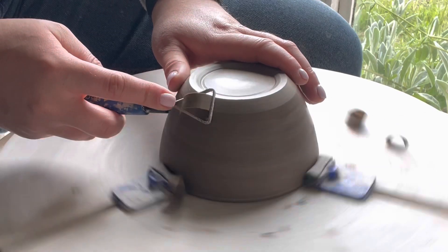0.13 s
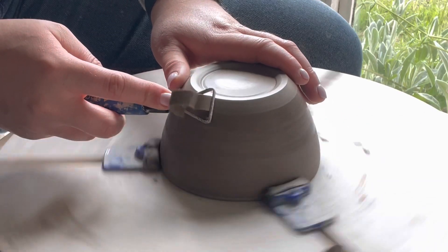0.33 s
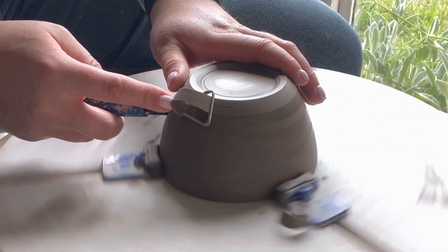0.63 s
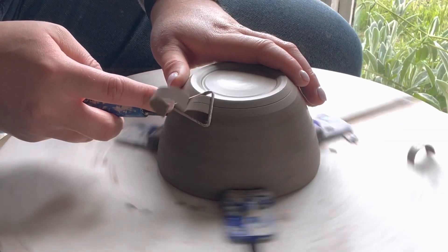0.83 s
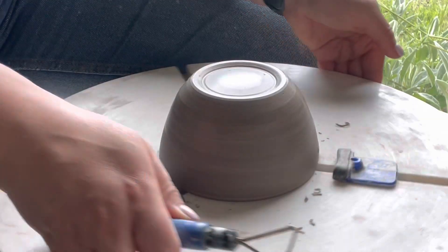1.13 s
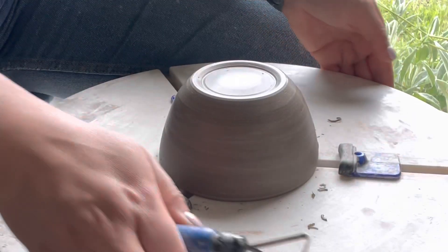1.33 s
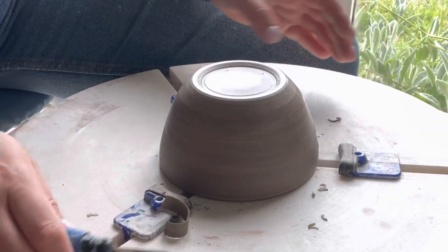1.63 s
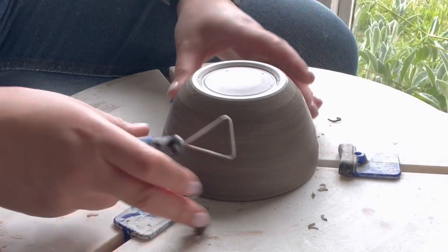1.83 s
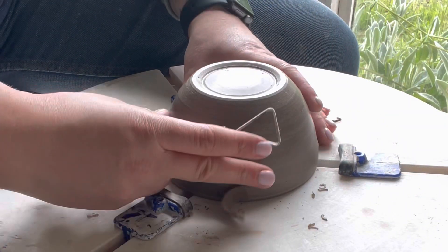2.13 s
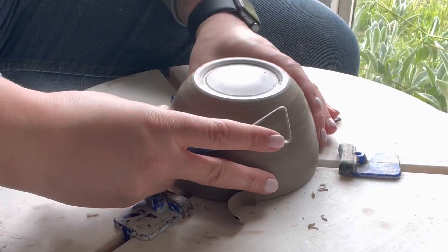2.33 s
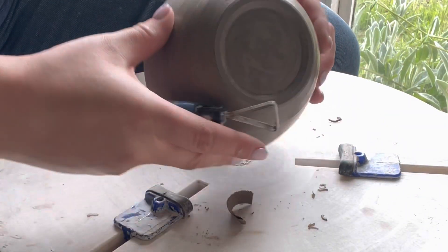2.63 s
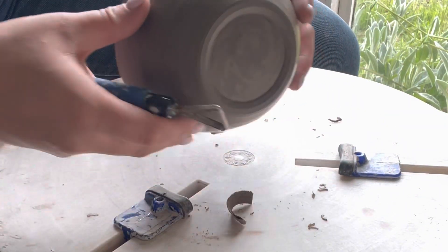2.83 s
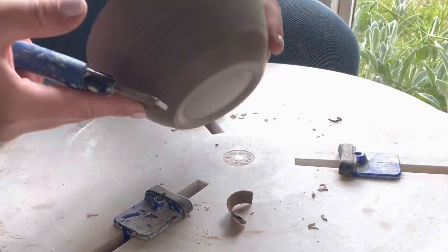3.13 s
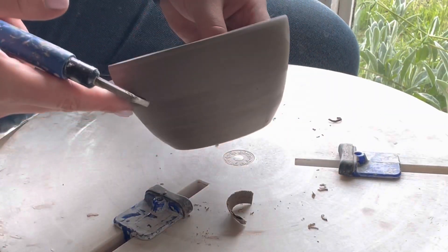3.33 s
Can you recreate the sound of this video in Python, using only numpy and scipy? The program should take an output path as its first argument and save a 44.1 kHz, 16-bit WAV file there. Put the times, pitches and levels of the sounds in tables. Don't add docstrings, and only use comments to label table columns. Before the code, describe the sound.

A blade softly scrapes a clay bowl on a humming wheel with small ticks, then clamps grind loudly open, squeak, and a few dull knocks follow; close stereo microphone, small studio, garden engines droning outside.

```python
import sys
import numpy as np
from scipy import signal
from scipy.fft import rfft, irfft, next_fast_len
from scipy.io import wavfile
from scipy.ndimage import uniform_filter1d, map_coordinates

SR = 44100
rng = np.random.default_rng(int(sys.argv[2]) if len(sys.argv) > 2 else 0)


def makeup_ratio(level_db):
    decades = np.asarray(level_db, float) / 20
    return 10 ** decades


def to_wav(sig):
    pcm = np.clip(np.atleast_2d(sig), -1, 1) * 32767
    pcm = np.round(pcm).astype(np.int16)
    wavfile.write(sys.argv[1], SR, pcm.T)


N = 153468
T = np.arange(N) / SR
CHANGE_S = 0.9347


def unit(x):
    return x / np.sqrt(np.mean(x ** 2) + 1e-20)


def along(points, hz):
    f, db = np.transpose(points)
    return np.interp(np.log(hz + 1), np.log(f + 1), db)


def curves(rows):
    s, *columns = np.transpose(rows)
    return [np.interp(T, s, column) for column in columns]


def wobble(rate):
    knots = rng.standard_normal(int(N * 400 / SR) + 4)
    return map_coordinates(knots, [T * min(rate, 400)])


def filtered(x, response):
    size = next_fast_len(N + 8192)
    return irfft(rfft(x, size) * response(np.fft.rfftfreq(size, 1 / SR)), size)[..., :N]


def rings(peaks):
    def response(f):
        total = 0
        for k, (hz, width, db) in enumerate(peaks):
            total = total + (-1) ** k * makeup_ratio(db) * 1j * f * width / (hz * hz - f * f + 1j * f * width)
        return total
    return response


def bell(hz, octaves):
    return lambda f: np.exp(-(np.log2((f + 1) / hz) / octaves) ** 2 / 2)


def grit(grain_db, patchy_db):
    grains = rng.standard_normal(N) * makeup_ratio(grain_db * np.minimum(rng.exponential(size=N), 5))
    z = signal.stft(grains, nperseg=512)[2]
    patches = uniform_filter1d(rng.standard_normal(z.shape), size=6, axis=0)
    patches = unit(uniform_filter1d(patches, size=8, axis=1))
    return unit(signal.istft(z * makeup_ratio(patchy_db * patches), nperseg=512)[1][:N])


def window(start, length, rise):
    u = (T - start) / length
    return np.sin(np.pi / 2 * np.clip(np.minimum(u / rise, (1 - u) / (1 - rise)), 0, 1)) ** 2


def machine(hz, db, orders, drift, flutter_db):
    phase = 2 * np.pi * np.cumsum(hz * (1 + drift * wobble(6.106))) / SR
    total = 0
    for multiple, order_db in orders:
        level = np.sqrt(2) * makeup_ratio(db + order_db + flutter_db * wobble(7))
        total = total + level * np.sin(multiple * phase + 2 * np.pi * rng.random())
    return total


# (frequency [Hz], level [dB])
FAN = [(63.4, -50), (126.9, -53)]
# (time [s], frequency [Hz], level [dB])
MOWER = [(0, 77.73, -39.5), (.5, 77.27, -46), (.93, 75.46, -41), (.94, 70.04, -49.5), (1.7, 71.45, -46),
         (2.3, 73.32, -45), (2.8, 76, -49), (3.48, 75.5, -43.5)]
# (multiple of the shaft [1], level [dB])
MOWER_ORDERS = [(1, -1), (2, -13.5), (3, -20.5), (4, -20)]
# (time [s], frequency [Hz], level [dB])
BLOWER = [(0, 60, -74), (.93, 58.8, -47), (.94, 54.6, -42), (1.5, 54.8, -42), (1.8, 56, -47),
          (2.3, 57.1, -42.5), (2.8, 58.4, -45.5), (3.48, 60, -45)]
# (multiple of the shaft [1], level [dB])
BLOWER_ORDERS = [(1, -26.5), (2, -2), (3, -13.5), (4, -23)]
# (frequency [Hz], density [dB per Hz])
AIR_LOW = [(18, -57), (30, -22.5), (54, -9), (119, -12), (254, -19), (288, -16.5), (328, -22.5),
           (442, -25.5), (900, -39.5), (1170, -60), (1980, -120)]
AIR_HIGH = [(530, -42), (900, 4), (1550, -4.5), (1820, 3.5), (2220, 2), (2590, -7), (3740, -10),
            (4580, -16), (12900, -29), (16800, -53), (22000, -120)]
# (time [s], length [s], frequency [Hz], level [dB])
FAR_TONES = [
    (2.78, 0.75, 962, -73),
    (3.168, 0.52, 303.9, -59),
]


def garden():
    sound = sum(machine(hz * np.ones(N), db, [(1, 0)], drift=.004, flutter_db=1.5) for hz, db in FAN)
    sound = sound + machine(*curves(MOWER), MOWER_ORDERS, drift=0.0035, flutter_db=1.5)
    sound = sound + machine(*curves(BLOWER), BLOWER_ORDERS, drift=0.0035, flutter_db=1)
    low = unit(filtered(grit(0, patchy_db=2.5), lambda f: makeup_ratio(along(AIR_LOW, f))))
    high = unit(filtered(grit(0, patchy_db=-0.5), lambda f: makeup_ratio(along(AIR_HIGH, f))))
    sound = sound + makeup_ratio(-51.5) * low + makeup_ratio(-71) * high
    for s, length, hz, db in FAR_TONES:
        unsteady_hz = hz * (1 + 0.0201 * wobble(60))
        whine = machine(unsteady_hz, db, [(1, 0)], drift=0.0151, flutter_db=2.5)
        sound = sound + whine * makeup_ratio(3.7 * wobble(45)) * window(s, length, 1 / 2) ** .5
    return sound


# (frequency [Hz], level [dB])
WHEEL_LINES = [(91, -54.5), (136.4, -51.5), (181, -59.5)]
# (time [s], level [dB])
TRIM = [(0, -65), (.16, -67), (.5, -65.5), (.85, -64), (.92, -62.5)]
# (frequency [Hz], density [dB per Hz])
RIBBON = [(1470, -33), (2500, -10), (10900, -10), (12900, -14), (16800, -46), (22000, -120)]
# (time [s], level [dB])
RUMBLE = [(0, -59.5), (.25, -58), (.5, -59), (.6, -52.5), (.68, -56), (.83, -59.5), (.92, -51)]
# (frequency [Hz], width [Hz], level [dB])
BOWL = [(259, 36, 4), (640, 55, -2), (817, 57, -3.5), (1192, 75, -6.5), (1500, 310, -14),
        (2330, 470, -14.5)]
# (time [s], length [s], level [dB], frequency [Hz])
BLADE = [
    (-.3, 1, -67.5, 10060),
    (0.096, 0.29, -66, 5650),
    (0.489, 0.33, -64, 5770),
    (0.818, 0.13, -68.5, 9500),
]


def trimming():
    rub = grit(grain_db=4, patchy_db=0.5) * makeup_ratio(1.4 * wobble(200))
    hiss = unit(filtered(rub, lambda f: makeup_ratio(along(RIBBON, f))))
    shake = grit(grain_db=2.0, patchy_db=0.5) * makeup_ratio(2.7 * wobble(39.8))
    body = unit(filtered(shake, lambda f: rings(BOWL)(f) * (f > 170)))
    sound = hiss * makeup_ratio(curves(TRIM)[0]) + body * makeup_ratio(curves(RUMBLE)[0])
    for hz, db in WHEEL_LINES:
        sound = sound + machine(hz * np.ones(N), db, [(0.95, 0)], drift=0.0096, flutter_db=3.5)
    for s, length, db, hz in BLADE:
        scrape = grit(grain_db=3.5, patchy_db=4) * makeup_ratio(1.6 * wobble(119.4))
        mode = rings([(hz, hz / 4.1, 0)])
        bite = unit(filtered(scrape, lambda f: mode(f) ** 2))
        sound = sound + makeup_ratio(db) * window(s, length, 0.27) ** .5 * bite
    return sound * (T < CHANGE_S)


# (time [s], level [dB], centre [Hz], T60 [s])
FLICKS = [(.152, -60, 900, .06), (.409, -59, 900, .04), (.466, -54, 1200, 0.072), (.527, -58, 1100, .05),
          (.74, -56.5, 1400, 0.043), (.802, -56, 1400, .03), (.849, -61, 1500, .06), (.9, -55, 1200, .06),
          (1.589, -56.5, 3300, 0.069), (1.668, -55, 1900, .018), (1.668, -54.5, 1400, .14),
          (1.815, -64, 5970, 0.23), (1.866, -56, 4500, .025), (1.868, -64.5, 6300, 0.3),
          (1.868, -62.5, 1970, 0.18), (1.918, -64, 2800, 0.079), (2.147, -51.5, 1240, 0.086),
          (2.163, -55, 750, 0.097), (2.193, -56, 650, 0.21), (2.387, -66, 800, .1)]
# (time [s], centre [Hz])
TICKS = [(.014, 10500), (.155, 5000), (.319, 10500), (.38, 10000), (.525, 5800), (.568, 6500), (.61, 5500),
         (.671, 6000), (.709, 5000), (.818, 3800), (.854, 10000)]


def flicks():
    out, count = np.zeros(N + SR), 16384
    t, f = np.arange(count) / SR, np.fft.rfftfreq(count, 1 / SR)
    tick_db, tick_t60 = -54.5, .015
    events = FLICKS + [(s, tick_db, hz, tick_t60) for s, hz in TICKS]
    for s, db, hz, t60 in events:
        noise = rng.standard_normal(count)
        burst = unit(irfft(rfft(noise) * bell(hz, octaves=0.63)(f)))
        onset = 1 - np.exp(-t * SR / 20)
        out[round(s * SR):][:count] += makeup_ratio(db - 60 * t / t60) * onset * burst
    return out[:N]


# (time [s], level [dB], pitch [Hz], T60 [s])
TAPS = [(.152, -53.5, 1250, 0.028), (.466, -49, 1373, 0.044), (0.574, -62, 1500, 0.064),
        (0.631, -55, 2130, 0.023), (0.803, -52, 1500, 0.033), (0.818, -56.5, 1280, 0.039),
        (1.587, -57, 2120, 0.054), (1.597, -50, 1390, 0.057), (1.592, -48, 640, 0.065),
        (1.611, -46.5, 640, 0.061), (1.613, -48, 249.5, 0.13), (1.6674, -51, 1820, 0.024),
        (2.141, -43.5, 658, 0.055), (2.148, -54.5, 1550, 0.057), (2.387, -62, 750, 0.082),
        (2.416, -58, 600, .05)]
# (multiple of its pitch [1], level [dB])
SHAPE = [(1, 7.5), (.82, 1.5), (1.24, 0), (1.6, -10.5), (2.3, -19.5)]


def taps():
    out, t = np.zeros(N + SR), np.arange(SR // 5) / SR
    ratio, level = np.transpose(SHAPE)
    spread_octaves, crack_db, crack_share = 0.06, -8.5, 1
    for s, db, hz, t60 in TAPS:
        away, size = rng.standard_normal((2, len(SHAPE)))
        band = signal.butter(2, [hz / 2, 2.53 * hz], "band", fs=SR)
        crack = unit(signal.lfilter(*band, rng.standard_normal(len(t))))
        mode_hz = hz * ratio * 2 ** (spread_octaves * away)
        ring = makeup_ratio(level + 2 * size) @ np.sin(2 * np.pi * mode_hz[:, None] * t)
        knock = ring * makeup_ratio(-60 * t / t60) * (1 - np.exp(-t * SR / 20))
        knock = knock + makeup_ratio(crack_db - 60 * t / (crack_share * t60)) * crack
        out[round(s * SR):][:len(t)] += makeup_ratio(db) * knock
    return out[:N]


# (time [s], length [s], frequency [Hz], level [dB])
SINGS = [(.948, .035, 1750, -40.5), (.962, 0.034, 1550, -43.5), (.978, 0.018, 2100, -44),
         (.96, 0.096, 755, -40), (.955, .07, 4120, -56), (1.01, 0.029, 1400, -39), (1.01, 0.036, 274, -38),
         (1.02, .1, 585, -41), (1.047, .015, 1550, -33.5), (1.04, 0.06, 1140, -47.5),
         (1.05, .06, 5580, -44.5), (1.06, 0.077, 2620, -57), (0.95, .04, 2700, -47), (1.07, .06, 1750, -52),
         (1.15, .06, 540, -46), (1.155, .025, 6300, -47), (1.25, 0.022, 2130, -59), (.565, .04, 1200, -64),
         (.6, 0.043, 1150, -63), (0.52, 0.048, 570, -53.5), (0.71, 0.024, 2780, -61.5),
         (.17, 0.086, 2300, -67), (.23, 0.081, 1600, -67), (0.28, 0.049, 780, -62), (.39, .04, 1150, -61),
         (.73, .026, 2000, -69), (1.593, 0.019, 2400, -58.5)]


def sings():
    out, count = np.zeros(N + SR), SR // 8
    t = np.arange(count) / SR
    for s, length, hz, db in SINGS:
        rough, drift = (map_coordinates(knots, [t * 200]) for knots in rng.standard_normal((2, 40)))
        tone = np.sin(2 * np.pi * np.cumsum(hz * (1 + 0.016 * drift)) / SR)
        swell = np.sin(np.pi * np.clip(t / length, 0, 1))
        out[round(s * SR):][:count] += makeup_ratio(db + 3 * rough) * tone * swell
    return out[:N]


# (time [s], level [dB])
SLIDE = [(.935, -43.5), (.96, -36), (.985, -35), (1.06, -33.5), (1.11, -36.5), (1.17, -37.5),
         (1.215, -43.5), (1.26, -62.5), (1.3, -67)]
# (frequency [Hz], density [dB per Hz])
SLOT = [(88, -24), (150, -10), (277, -9.5), (459, -36.5), (745, -0.5), (980, -14), (1400, -7.5),
        (2150, -6.5), (8400, -13.5), (12900, -27), (16800, -47), (22000, -120)]
# (frequency [Hz], width [Hz], level [dB])
PLATE = [(284, 78, 0), (563, 32, 4), (640, 40, 2.5), (750, 17, 5.5), (1128, 33, -3), (1540, 54, -1),
         (1830, 33, -5), (2490, 45, -11)]
# (time [s], length [s], lower mode [Hz], upper mode [Hz], level [dB], octave level [dB])
SQUEAK = (1.126, .04, 2080, 2230, -35.5, -10)


def clamps():
    rub = grit(grain_db=1.9, patchy_db=1.4) * makeup_ratio(1 * wobble(69.93))
    slot = unit(filtered(rub, lambda f: makeup_ratio(along(SLOT, f))))
    plate = unit(filtered(rub, rings(PLATE)))
    travel = makeup_ratio(curves(SLIDE)[0]) * (T < SLIDE[-1][0]) * (T > CHANGE_S)
    grind = unit(slot + makeup_ratio(-2) * plate) * travel

    s, length, hz, upper_hz, db, octave_db = SQUEAK
    phase = 2 * np.pi * np.cumsum(np.outer([hz, upper_hz], 1 + .004 * wobble(150)), axis=1) / SR
    squeak = np.sum(np.sin(phase) + makeup_ratio(octave_db) * np.sin(2.1 * phase), axis=0)
    squeak = squeak * (1 - .75 * window(s + .008, .012, 1 / 2))
    return grind + makeup_ratio(db) * squeak * window(s, length, 1 / 2) ** .5


# (time [s], length [s], level [dB], centre [Hz])
RUSTLES = [(1.6, 0.16, -57.5, 600), (2.377, 0.09, -65, 600), (1.274, 0.28, -70, 5008),
           (1.473, 0.29, -72, 5460), (1.576, 0.12, -65.5, 4630), (1.659, 0.077, -71.5, 5000),
           (1.765, 0.074, -81, 6955), (1.792, 0.095, -78, 7000), (1.865, 0.11, -66.5, 5470),
           (2.027, 0.13, -71.5, 9700), (2.1, 0.17, -76.5, 4500), (2.2, 0.13, -80.5, 5500),
           (2.364, 0.1, -77, 4480), (2.5, 0.19, -81, 4680), (2.718, 0.2, -86.5, 9010),
           (2.844, 0.11, -84, 6000), (3.129, 0.15, -79, 10000), (3.47, 0.037, -86, 6100)]


def rustles():
    out = np.zeros(N)
    for s, length, db, hz in RUSTLES:
        brush = rng.standard_normal(N) * makeup_ratio(1.7 * wobble(120))
        out += makeup_ratio(db) * window(s, length, 0.23) * unit(filtered(brush, bell(hz, octaves=0.7)))
    return out


def room(x):
    t = np.arange(SR // 3) / SR
    t60 = 0.34
    tail = rng.standard_normal((2, len(t))) * makeup_ratio(-60 * t / t60) * (t > .003)
    wet = signal.fftconvolve(x[None], tail / np.linalg.norm(tail[0]), axes=1)[:, :N]
    return filtered(wet, lambda f: f / (f + 400) * 5000 / (f + 5000))


def stereo(x, side_db, smear_s):
    t = np.arange(2048) / SR
    tail = rng.standard_normal(len(t)) * makeup_ratio(-60 * t / smear_s)

    def response(f):
        scatter = np.angle(np.fft.rfft(tail, 2 * len(f) - 2))
        share = np.clip(f / 1500, .5, 1)
        return makeup_ratio(along(side_db, f)) * 1j * np.exp(1j * share * scatter)

    side = filtered(x, response)
    return np.array([x + side, x - side])


# (frequency [Hz], side over mid [dB])
NEAR_SIDE = [(60, -74), (130, -55), (280, -87), (590, -8.5), (1260, -22.5), (2710, -6), (5810, -17.5),
             (12400, 7)]
FAR_SIDE = [(60, -37.5), (130, -35), (280, -16.5), (590, 1), (1260, -2), (2710, -6.5), (5810, -3),
            (12400, 3)]


def scene():
    work = clamps() + taps() + sings() + flicks()
    near = stereo(work + trimming() + rustles(), NEAR_SIDE, smear_s=1 / 20)
    far = stereo(garden(), FAR_SIDE, smear_s=0.074)
    return near + makeup_ratio(-7.5) * room(work) + far


def low_pass(x):
    return signal.sosfilt(signal.butter(12, 15700, fs=SR, output="sos"), x)


# (low edge [Hz], high edge [Hz], side level [dB])
SIDE_GAP = (4800, 7800, -9)


def record(dry):
    fade_out_s, fade_in_s = 0.04, 0.026
    gain = np.maximum((CHANGE_S - T) / fade_out_s, (T - CHANGE_S) / fade_in_s)
    gain = np.clip(gain, .02, 1)
    low, high, db = SIDE_GAP
    trim_top_hz, later_top_hz = 12350, 13040
    mid = (dry[0] + dry[1]) / 2
    trim_mid = filtered(mid, lambda f: f < trim_top_hz)
    later_mid = filtered(mid, lambda f: f < later_top_hz)
    mid = np.where(T < CHANGE_S, trim_mid, later_mid)
    side = filtered((dry[0] - dry[1]) / 2, lambda f: makeup_ratio(db * ((f > low) & (f < high))))
    return low_pass(np.array([mid + side, mid - side]) * gain)


dry = scene()
out = record(dry)
to_wav(out)
```